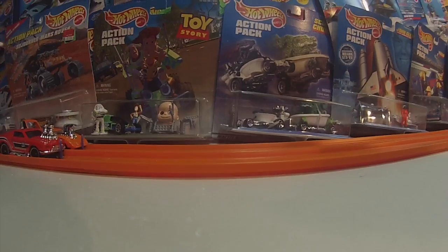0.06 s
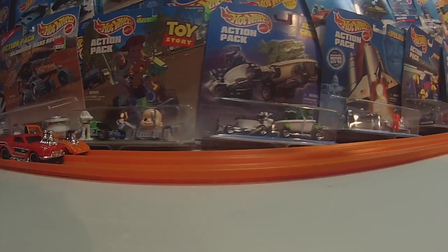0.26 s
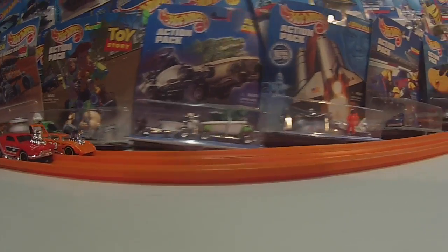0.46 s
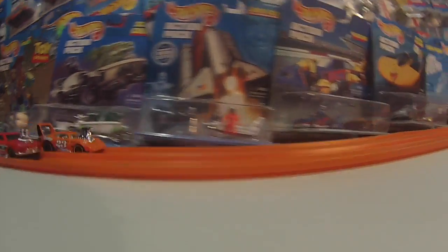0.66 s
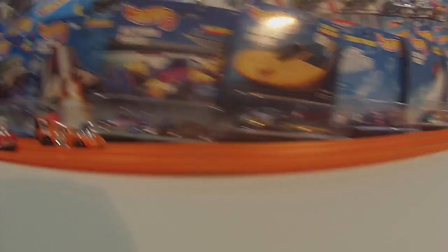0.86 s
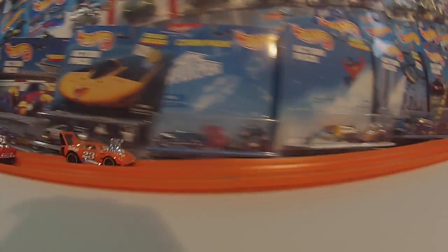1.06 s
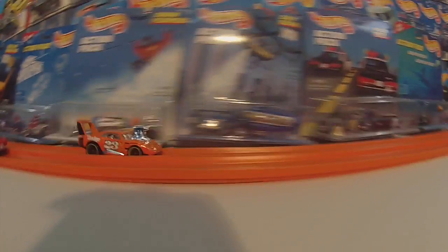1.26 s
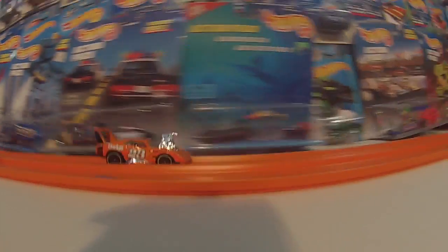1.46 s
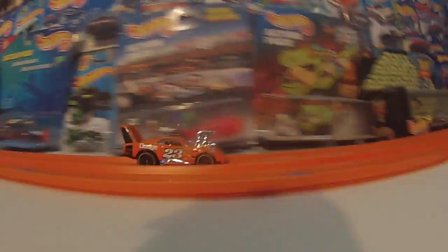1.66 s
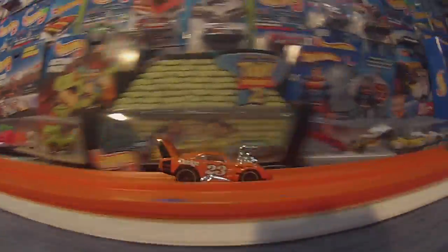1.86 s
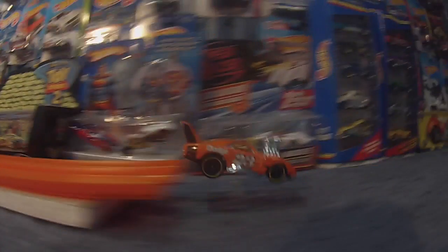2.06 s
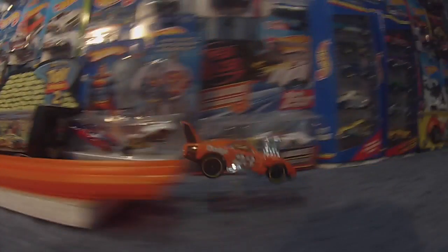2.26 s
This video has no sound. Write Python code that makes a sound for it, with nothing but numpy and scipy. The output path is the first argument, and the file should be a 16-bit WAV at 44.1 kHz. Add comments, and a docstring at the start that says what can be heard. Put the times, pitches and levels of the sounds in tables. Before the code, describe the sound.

After a bright click and a few tiny squeaks, toy cars roll along a plastic track, clattering more densely as they speed up. Heard from aboard one car, with low thumps and rumble, the sound stops abruptly mid-roll.

```python
"""Die-cast toy cars rattle down a plastic track, with the microphone riding on one of them.
A latch clicks and dry axles chirp. As the flawed wheels spin up, they shake the car bodies
and drum through the microphone's mount. Loose axles tick, wheels knock on the rails and
track joints jolt the ride. The sound cuts off abruptly while the cars are still rolling."""
import sys
import numpy as np
from scipy import signal
from scipy.fft import rfft, irfft
from scipy.io import wavfile
from scipy.ndimage import uniform_filter1d

SR = 44100
rng = np.random.default_rng(int(sys.argv[2]) if len(sys.argv) > 2 else 0)


def file_out(sig):
    """Save sig as 16-bit WAV at sys.argv[1]."""
    # one column per channel
    cols = np.atleast_2d(sig).T
    # limit, then scale
    lim = np.clip(cols, -1, 1)
    pcm = np.round(lim * 32767).astype(np.int16)
    wavfile.write(sys.argv[1], SR, pcm)


N = 105840
T = np.arange(N) / SR
TICK_DECAY_S = 0.0016

# how fast the wheels spin (time [s], speed [turns per s])
WHEEL_SPEED = [(.15, 5.9), (.5, 14.05), (.62, 19), (.78, 26.3), (1.05, 40.3), (1.25, 42.2), (1.5, 46),
               (1.8, 45.8), (2.1, 44)]
# tone of a car body (frequency [Hz], level [dB])
BODY_TONE = [(400, -29.5), (750, -16.5), (1150, -10), (1350, -1.5), (1950, -1.5), (2350, -5), (3100, -2),
             (3650, -3), (4250, -9), (4900, -21.5), (7000, -20), (10000, -42.5), (15500, -46)]
# tone of a thud through the microphone's mount (frequency [Hz], level [dB])
THUD_TONE = [(40, 7), (110, -2), (350, 2), (520, -8.5), (800, -18.5), (1200, -17), (2500, -41.5),
             (8000, -71.5)]
# tone of the axle metal (frequency [Hz], level [dB])
METAL_TONE = [(400, -39), (1500, -19.5), (3000, -4.5), (5300, -4), (6700, 0), (7300, -3.5), (8000, 0.5),
              (8650, -9), (9100, -5), (9800, -11.5), (11800, -12), (13000, -16.5), (13850, -8.5),
              (14400, -15), (15500, -23.5)]


def body_rattle():
    """Track grit and rim flaws shake the car bodies; grit also makes the wheels rasp."""
    # loudness of rattle and rasp together (time [s], level [dB])
    rattle_level = [(.1, -74), (.26, -49), (.3, -33.5), (.36, -34), (.45, -24.5), (.6, -22), (.69, -25.5),
                    (.89, -20.5), (.95, -27.5), (1.0, -25), (1.16, -24.5), (1.22, -20.5), (1.31, -21),
                    (1.338, -28), (1.37, -21), (1.47, -20.5), (1.515, -27), (1.6, -19), (1.665, -23),
                    (1.71, -20), (1.79, -18), (1.83, -27), (1.89, -20), (2.0, -25), (2.1, -22.5)]
    # tone of the rasp, strongest near 3.5 kHz (frequency [Hz], level [dB])
    rasp_tone = [(1500, -26), (2500, -9), (3000, 2), (3550, 3.5), (4050, -1), (4700, -15.5), (7000, -37),
                 (15000, -56)]
    # loudness of the rasp on top of rattle_level (time [s], level [dB])
    rasp_level = [(.38, -44), (.6, -5.5), (.85, -10.5), (1.0, 2), (1.12, -2), (1.3, 3.5), (1.42, 0.5),
                  (1.58, -4.5), (1.68, 1.5), (1.78, -3.5), (2.1, -5)]
    from_grit = steady(colour(shell_ring(grit(per_turn=95, spread_db=6.5)), BODY_TONE))
    from_flaws = steady(colour(shell_ring(rim_flaws()), BODY_TONE))
    rattle = amp(-1.5) * steady(from_grit + amp(-6) * from_flaws)
    rasp = steady(colour(grit(per_turn=95, spread_db=6.5), rasp_tone)) * amp(curve(rasp_level))
    return (rattle + rasp) * steady(wheel_load()) * amp(curve(rattle_level))


def grit(per_turn, spread_db):
    """Wheels hit tiny bumps in the track at random, more often as they speed up."""
    hits = rng.random(N) < per_turn * curve(WHEEL_SPEED) / SR
    return hits * rng.choice([-1, 1], N) * amp(spread_db * scatter(N))


def rim_flaws(per_wheel=2):
    """Four wheels, each at a slightly different speed, strike their own rim flaws on every turn."""
    out = np.zeros(N)
    for wheel in range(4):
        turns = wheel_turns() * (1 + 0.018 * rng.uniform(-1, 1))
        jitter = amp(4.5 * scatter(N))
        for place, softness in rng.uniform(-1, 1, (per_wheel, 2)):
            hits = np.flatnonzero(np.diff(np.floor(turns + place)))
            out[hits] += np.sign(place) * amp(-2.5 * softness) * jitter[hits]
    return out


def shell_ring(hits):
    """A car's shell adds a short, blurred ring to each hit."""
    tail = rng.standard_normal(N) * fade(0, decay_s=0.0039)
    return hits + amp(3) * signal.fftconvolve(hits, tail / np.linalg.norm(tail))[:N]


def wheel_load(flickers_per_s=71, depth_db=2):
    """The weight on the wheels swells once a turn and flickers as the cars jiggle."""
    flicker = np.interp(T * flickers_per_s, np.arange(N), scatter(N))
    swell = np.sin(2 * np.pi * wheel_turns())
    return amp(depth_db * (flicker + swell))


def mount_drumming():
    """Track bumps and rim flaws send a low drumming through the microphone's mount."""
    # tone of the mount (frequency [Hz], level [dB])
    mount_tone = [(40, -13), (85, 1), (150, -1), (280, 1), (400, -2), (470, -10), (600, -22.5), (900, -37),
                  (2000, -69)]
    # how the drumming rises and falls (time [s], level [dB])
    drum_level = [(.08, -59.5), (.2, -37.5), (.3, -18), (.365, -20), (.43, -11.5), (.5, -12.5), (.6, -15),
                  (.88, -18), (.95, -19), (1.0, -24), (1.06, -19.5), (1.15, -24.5), (1.25, -18),
                  (1.5, -24.5), (1.7, -19), (2.0, -31.5), (2.1, -29)]
    from_grit = steady(colour(grit(per_turn=80, spread_db=2.5), mount_tone))
    from_flaws = steady(colour(rim_flaws(), mount_tone))
    return steady(from_grit + amp(-1.5) * from_flaws) * amp(curve(drum_level) - 2)


def hollow_patter():
    """Rim flaws also make a hollow patter that grows with speed."""
    speed = curve(WHEEL_SPEED) / curve(WHEEL_SPEED).max()
    return amp(-23) * steady(colour(rim_flaws(), THUD_TONE)) * (speed - speed.min()) ** 0.74


def rail_knocks():
    """A wheel knocking on a rail rings the car body, the mount and the metal axle."""
    # knocks on the rails (time [s], body level [dB], mount level [dB], axle level [dB])
    knocks = [(0.1838, -65, -30.5, -83), (0.3151, -24.5, -24, -31), (0.559, -25, -18.5, -33),
              (0.5634, -35, -21, -28), (.610, -22, -26, -35), (0.6504, -30, -18, -24.5),
              (0.658, -28, -13, -26), (0.714, -21, -10, -30), (0.7418, -17, -21, -31),
              (0.779, -17, -37, -28.5), (0.848, -18, -11.5, -36.5), (0.881, -18, -8.5, -31),
              (0.912, -18.5, -28, -33), (0.9205, -18, -24.5, -15.5), (0.923, -26, -13.5, -33.5),
              (0.9426, -23.5, -11.5, -23.5), (0.958, -26.5, -10.5, -28), (1.008, -18, -19, -27),
              (1.059, -44, -13, -37), (1.0839, -18, -19.5, -32), (1.111, -27.5, -20, -32),
              (1.211, -19.5, -16, -29), (1.227, -19, -17, -26.5), (1.304, -21, -18, -28),
              (1.33, -20.5, -19, -38), (1.355, -22, -21, -27.5), (1.3663, -27, -30, -32),
              (1.378, -22, -18.5, -32.5), (1.3956, -21, -24, -39.5), (1.518, -21, -19, -37.5),
              (1.546, -12.5, -22.5, -23.5), (1.694, -16, -11, -33), (1.758, -16, -14, -26.5),
              (1.7783, -18.5, -12.5, -27.5), (1.816, -20.5, -26.5, -20.5), (1.8382, -19, -16, -21.5),
              (1.944, -25.5, -18.5, -32), (2.0335, -19.5, -16.5, -24), (2.06, -18, -17.5, -25),
              (2.077, -27, -13.5, -27.5)]
    knocks = np.array(knocks)
    body = strikes(knocks[:, [0, 1]], BODY_TONE, decay_s=0.00067)
    mount = strikes(knocks[:, [0, 2]], THUD_TONE, decay_s=0.0026)
    axle = strikes(knocks[:, [0, 3]], METAL_TONE, TICK_DECAY_S)
    return body + mount + axle


def track_jolts(rise_s=0.00047):
    """Each jolt bounces the microphone's car for a cycle or two."""
    # jolts at the start and at track joints (time [s], frequency [Hz], level [dB], decay [s])
    jolts = [(.124, 131, -26, 0.011), (0.187, 35.5, -14.5, 0.02), (0.342, 73.4, -2, 0.0073),
             (0.42, 110.5, -3.5, .012), (0.451, 89.2, -4.5, .01), (0.484, 111, -2.5, 0.013),
             (.712, 59, 0.5, 0.011), (0.919, 106, 6, 0.0042), (0.975, 40.8, -17, 0.057),
             (1.355, 54, -14, 0.049), (1.675, 70.46, -8, 0.022), (1.814, 136.3, -1, 0.0062)]
    out = np.zeros(N)
    for start, hz, db, decay_s in jolts:
        shape = fade(start, decay_s) - fade(start, rise_s)
        out += amp(db) * shape * np.sin(2 * np.pi * hz * (T - start))
    return out


def axle_ticks(count=150):
    """Loose axles tick in their slots about twice a turn, now and then harder, over faint rubbing."""
    # the clearest ticks (time [s], level [dB])
    clear_ticks = [(.335, -28), (.424, -36), (.456, -28), (.499, -38), (.664, -42), (.703, -29),
                   (.7102, -22), (.7235, -31), (.7865, -40), (.8155, -34.5), (.9695, -32), (.979, -30),
                   (1.029, -33), (1.173, -27), (1.235, -31), (1.2825, -33.5), (1.3738, -24.5),
                   (1.44, -29.5), (1.483, -28.5), (1.595, -29.5), (1.667, -30), (1.687, -32.5),
                   (1.7305, -32.5), (1.766, -29), (1.903, -31)]
    # loudness of the ongoing ticking (time [s], level [dB])
    tick_level = [(.18, -81), (.3, -41.5), (.45, -37), (.6, -43), (.88, -38), (.98, -32), (1.14, -35),
                  (1.37, -31), (1.45, -37), (1.7, -28.5), (2.1, -36)]
    level_db = curve(tick_level)
    slip, strength = scatter((count, 2)).T
    times = np.interp(np.arange(count) / 2 + 0.15 * slip, wheel_turns(), T)
    ticks = np.c_[times, np.interp(times, T, level_db) + 2 * strength]
    rubbing = noise(METAL_TONE) * amp(level_db - 7)
    return strikes(np.vstack([clear_ticks, ticks]), METAL_TONE, TICK_DECAY_S) + rubbing


def axle_chirps():
    """Dry axles squeak in short rising notes while the wheels are slow."""
    # squeaks (time [s], length [s], start pitch [Hz], end pitch [Hz], level [dB])
    chirps = [(0.275, 0.041, 1490, 1700, -26.5), (0.322, 0.017, 1614, 1840, -21.5),
              (0.375, 0.0253, 1706, 1820, -22.5), (0.413, 0.028, 1729, 1853, -17)]
    wobble = 1 + 0.0357 * unit(uniform_filter1d(rng.standard_normal(N), size=90))
    drift = unit(uniform_filter1d(rng.standard_normal(N), size=130))
    flutter = amp(2.5 * np.clip(drift, -2, 2))
    out = np.zeros(N)
    for start, length, from_hz, to_hz, db in chirps:
        progress = np.clip((T - start) / length, 0, 1)
        pitch_hz = (from_hz + (to_hz - from_hz) * progress) * wobble
        phase = 2 * np.pi * np.cumsum(pitch_hz) / SR
        overtones = amp(-15) * sum(np.sin(k * phase) / (k - 1) for k in (2, 3, 4))
        shape = np.sqrt(np.abs(np.sin(np.pi * progress)))
        out += amp(db) * shape * flutter * (np.sin(phase) + overtones)
    return out


def latch_click(rise_s=0.00028):
    """The latch lets the cars go with a bright click and a softer rebound."""
    # click and rebound (time [s], level [dB])
    blows = [(0.145, -13), (0.1544, -24)]
    # notes the latch rings at (frequency [Hz], level [dB], time to fade by 60 dB [s])
    notes = [(4460, -24, 0.026), (5940, -14, 0.024), (6590, -6, 0.012), (6720, -4.5, 0.011),
             (7000, -21, .012), (12040, -9, 0.01)]
    out = np.zeros(N)
    for start, db in blows:
        ring = np.zeros(N)
        for hz, note_db, ring_s in notes:
            ring += amp(note_db) * fade(start, ring_s / np.log(1000)) * np.sin(2 * np.pi * hz * (T - start))
        snap = amp(-28) * fade(start, decay_s=0.0015)
        tail = amp(-15.5) * fade(start, decay_s=0.0091)
        crack = noise(METAL_TONE) * (snap + tail)
        out += amp(db) * (ring + crack) * (1 - fade(start, rise_s)) ** 2
    return out


def deep_rumble():
    """A deep rumble swells and sinks as the cars roll."""
    # tone of the rumble (frequency [Hz], level [dB])
    rumble_tone = [(10, -8.5), (25, -3.5), (40, 3.5), (62, 3), (100, -19), (200, -44.5)]
    # loudness of the rumble (time [s], level [dB])
    rumble_level = [(0, -58), (.08, -46), (.19, -35.5), (.45, -33), (.68, -23.5), (.8, -35), (.99, -20.5),
                    (1.12, -34.5), (1.36, -20), (1.45, -25.5), (1.53, -24), (1.9, -28), (2.08, -24.5)]
    return noise(rumble_tone) * amp(curve(rumble_level))


def room_air():
    """The room adds a faint, low hush."""
    # tone of the hush (frequency [Hz], level [dB])
    air_tone = [(30, 6.5), (120, 0), (400, -21.5), (1000, -16.5), (4000, -27.5), (15000, -55)]
    return amp(-51) * noise(air_tone)


def strikes(rows, tone, decay_s, rise_s=0.003, size=2048):
    """Each row (time [s], level [dB]) is a burst of chatter that rings a part with the given tone."""
    out = np.zeros(2 * N)
    bands = np.linspace(0, 23, size // 2 + 1)
    ring = rfft(colour(1. * (T == 0), tone)[:size])
    shape = (fade(0, decay_s) * (1 - fade(0, rise_s)))[:size]
    for (start, db), (chatter, tilt) in zip(rows, rng.standard_normal((len(rows), 2, size))):
        # each strike lands somewhere else, so it brings out different frequencies
        tint = amp(4.5 * np.interp(bands, np.arange(size), np.clip(tilt, -2, 2)))
        burst = irfft(rfft(chatter) * tint) * shape
        blow = irfft(rfft(burst) * ring)
        at = int(start * SR)
        out[at:at + size] += amp(db) * blow * np.sqrt(.005 * SR / np.sum(blow ** 2))  # level over 5 ms
    return out[:N]


def colour(x, tone):
    """Make x ring like an object with the given tone (frequency [Hz], level [dB])."""
    hz, db = np.array(tone, float).T
    size = 2 * N
    bin_hz = np.maximum(np.arange(N + 1) * SR / size, 1)
    cepstrum = irfft(np.log(amp(np.interp(np.log(bin_hz), np.log(hz), db))))
    # fold it so that the ringing comes after each hit, never before
    cepstrum[1:N] *= 2
    cepstrum[N + 1:] = 0
    return irfft(rfft(x, size) * np.exp(rfft(cepstrum)))[:N]


def wheel_turns():
    """Turns made so far."""
    return np.cumsum(curve(WHEEL_SPEED)) / SR


def noise(tone):
    """Noise with the given tone, at level 1."""
    return unit(colour(rng.standard_normal(N), tone))


def scatter(shape):
    """Bell-curve random numbers, kept within -2 and 2."""
    return np.clip(rng.standard_normal(shape), -2, 2)


def steady(x):
    """Hold the slow level near 1 and keep the fine grain."""
    slow_power = np.maximum(uniform_filter1d(x ** 2, SR // 12), 0)
    return x / np.sqrt(slow_power + .01 * np.mean(x ** 2))


def fade(start, decay_s):
    """Jump to 1, then die away."""
    return (T >= start) * np.exp(-np.maximum(T - start, 0) / decay_s)


def curve(rows):
    """Join (time [s], value) points by straight lines."""
    return np.interp(T, *np.array(rows, float).T)


def amp(db):
    """Decibels to gain."""
    return 10 ** (np.asarray(db) / 20)


def unit(x):
    """Scale to an average (rms) level of 1."""
    return x / np.sqrt(np.mean(x ** 2) + 1e-18)


def scene():
    """The rolling cars over faint room air, in one channel."""
    air = room_air()
    rolling = body_rattle() + mount_drumming() + hollow_patter() + deep_rumble()
    events = axle_ticks() + rail_knocks() + track_jolts() + axle_chirps() + latch_click()
    return (rolling + events + air)[None]


def record(dry, cut_s=2.109):
    """Round off the peaks, cut to silence and remove the deepest bass and highest treble."""
    bass_cut = signal.butter(1, 12, "high", fs=SR, output="sos")
    treble_cut = signal.ellip(10, .2, 70, 15250, fs=SR, output="sos")
    rounded = 1.4 * np.tanh(signal.sosfilt(bass_cut, dry) / 1.6)
    gate = (T < cut_s) + fade(cut_s, decay_s=0.0014)
    return signal.sosfilt(treble_cut, rounded * gate)


dry = scene()
out = record(dry)
file_out(out)
```